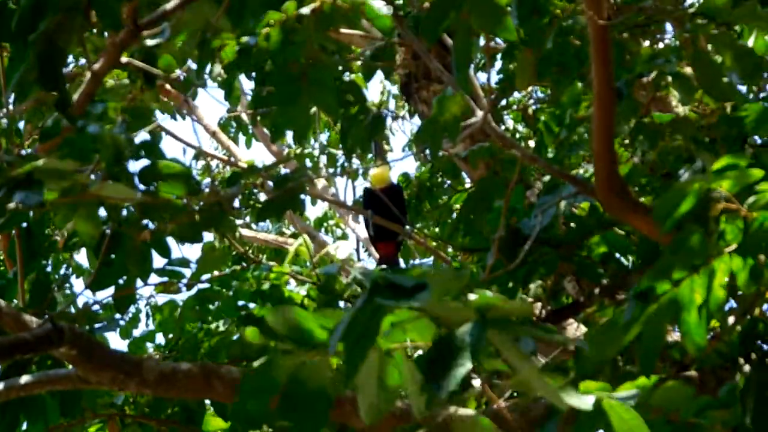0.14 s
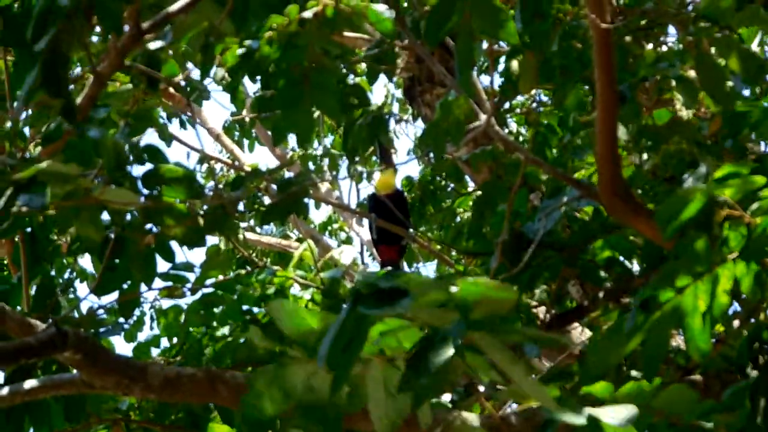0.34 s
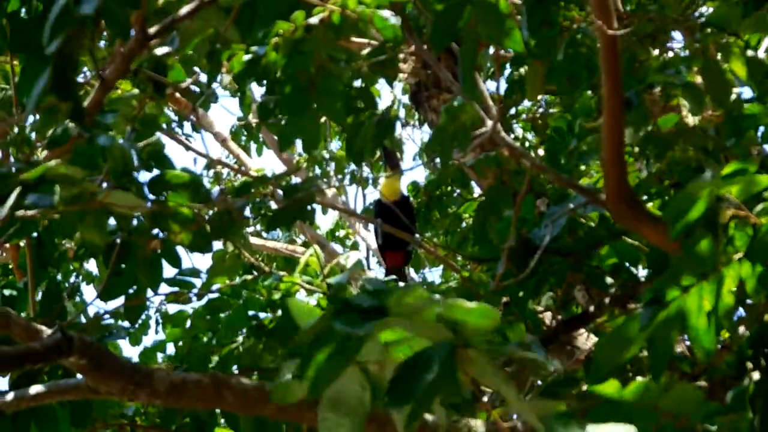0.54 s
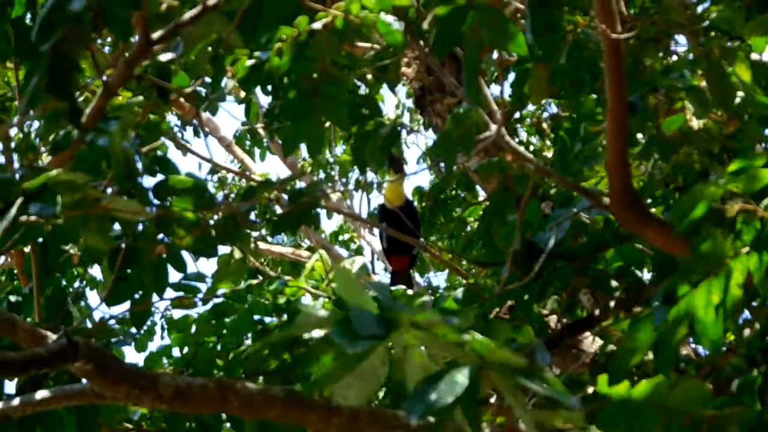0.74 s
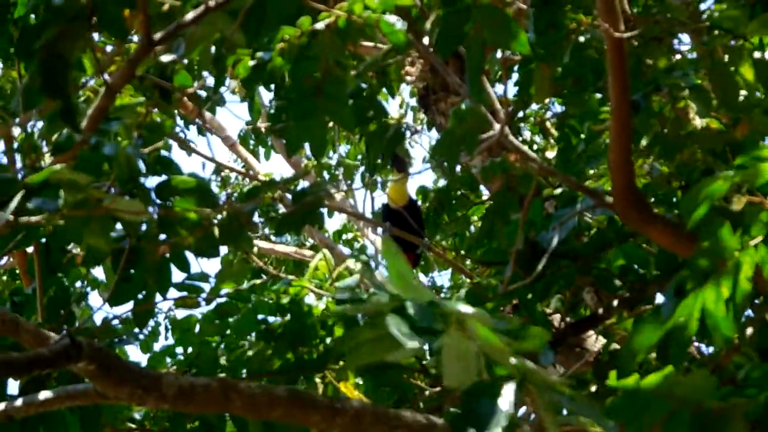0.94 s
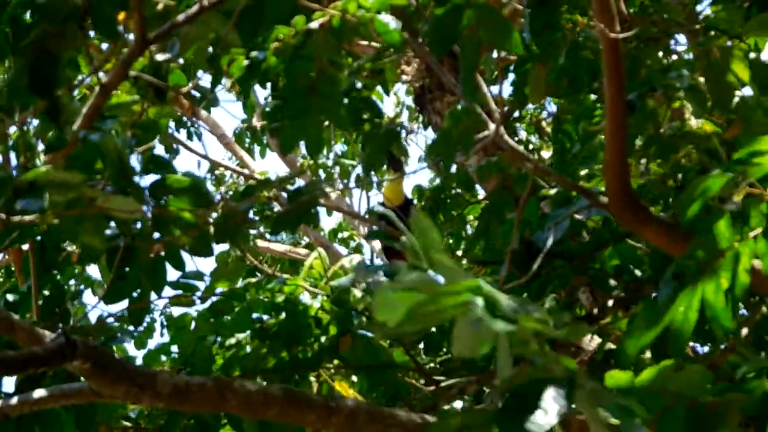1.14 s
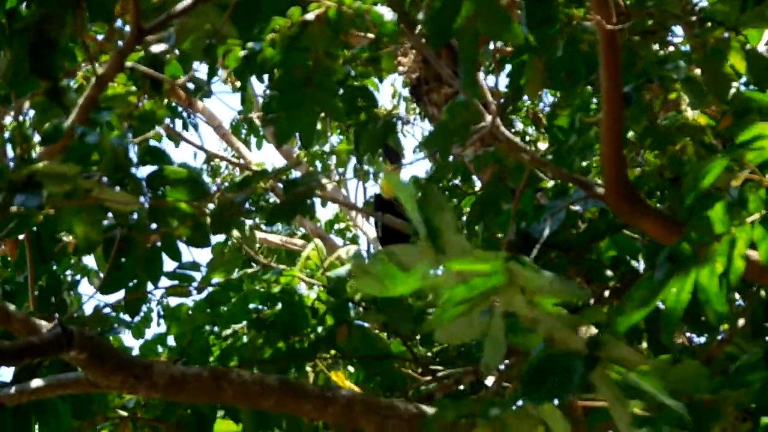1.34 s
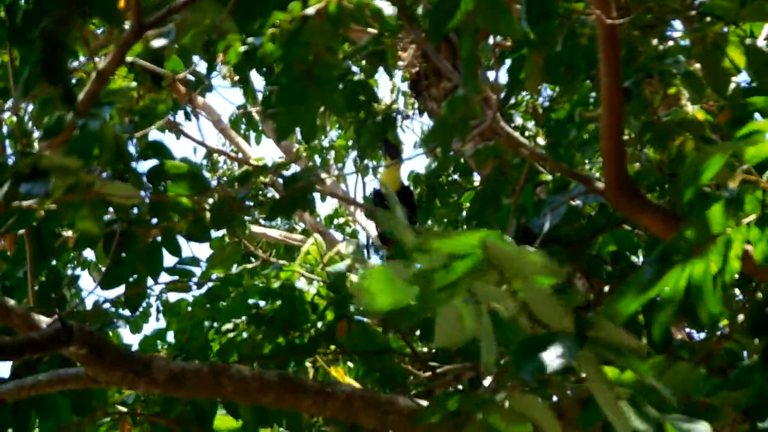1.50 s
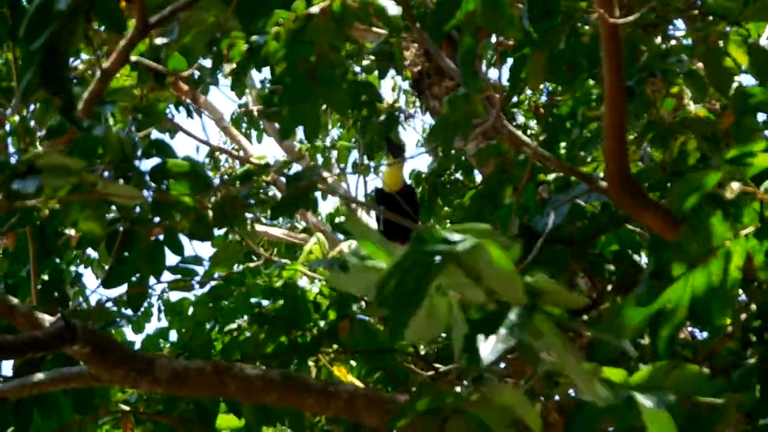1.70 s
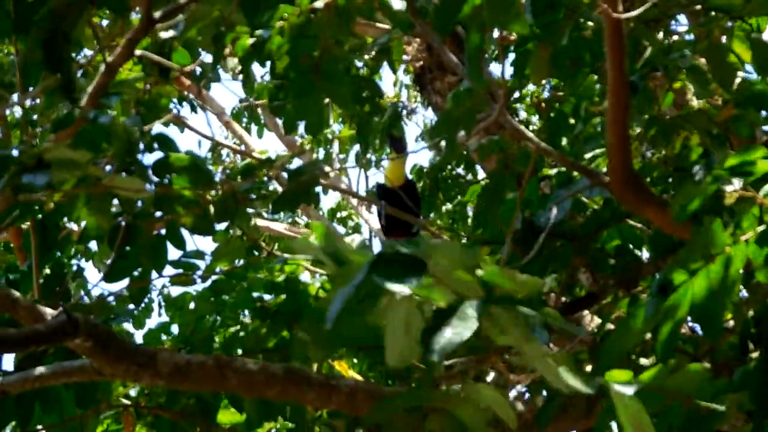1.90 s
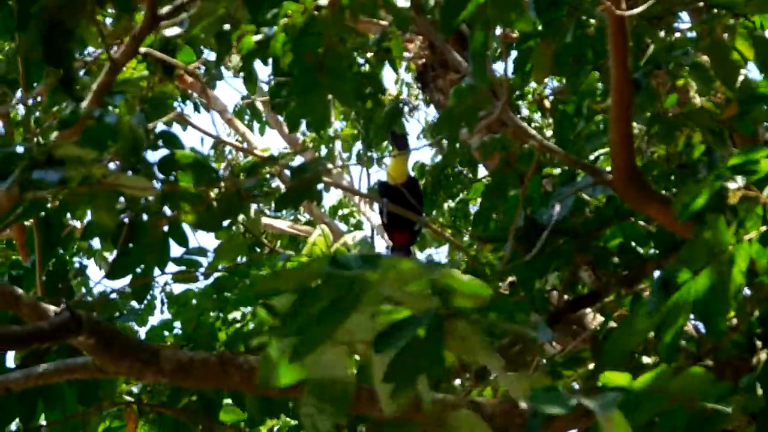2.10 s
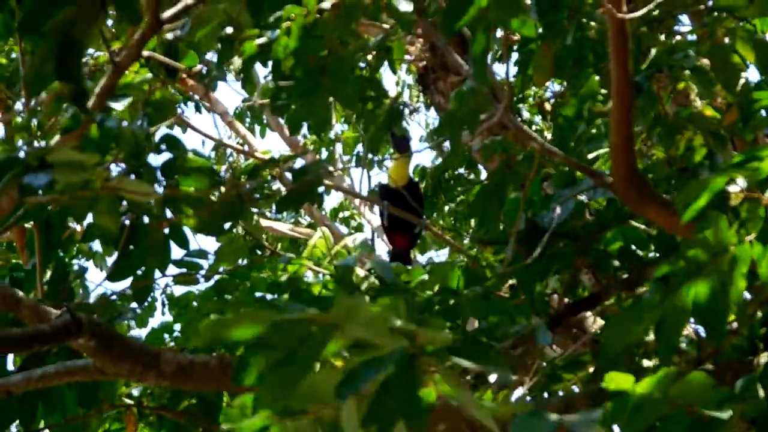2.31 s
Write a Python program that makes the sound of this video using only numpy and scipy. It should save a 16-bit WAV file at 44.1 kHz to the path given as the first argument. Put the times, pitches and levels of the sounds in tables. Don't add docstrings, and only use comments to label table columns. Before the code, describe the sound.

Four bright toucan yelps drop in pitch within the first second, the first longest, with woodland reverberation; afterwards only breeze, soft rumble, high insects and a faint distant bird whistle reach the stereo microphone.

```python
import sys
import numpy as np
from scipy import signal
from scipy.fft import rfft, irfft, next_fast_len
from scipy.io import wavfile
from scipy.ndimage import uniform_filter1d, map_coordinates

SR = 44100
rng = np.random.default_rng(int(sys.argv[2]) if len(sys.argv) > 2 else 0)


def linear_from_db(decibels):
    return 10 ** (np.asarray(decibels, float) / 20)


def transcribe(u):
    v = np.clip(np.atleast_2d(u).T, -1, 1)
    q = np.round(v * 32767).astype(np.int16)
    wavfile.write(sys.argv[1], SR, q)


N = 103635
TIME_S = np.arange(N) / SR
FLOOR_LAG_S, FLOOR_PAN_DB = -.00011, 0.6


def unit(x):
    return x / np.sqrt(np.mean(x ** 2) + 1e-20)


def along(points, hz):
    f, value = np.transpose(points)
    return np.interp(np.log(hz + 1), np.log(f + 1), value)


def wobble(rate):
    knots = rng.standard_normal(int(N * rate / SR) + 4)
    return map_coordinates(knots, [np.arange(N) * rate / SR])


def filtered(x, response):
    m = next_fast_len(N + SR // 2)
    return irfft(rfft(x, m) * response(np.fft.rfftfreq(m, 1 / SR)), m)[..., :N]


def track(rows, smooth_s):
    s, hz, db = np.transpose(rows)
    width = int(smooth_s * SR)
    gain = linear_from_db(np.interp(TIME_S, s, db)) * (TIME_S >= s[0]) * (TIME_S <= s[-1])
    pitch = uniform_filter1d(np.interp(TIME_S, s, hz), width)
    return pitch, np.sqrt(2) * uniform_filter1d(gain, width // 2)


def ports(x, pan_db, lag_s):
    side = np.array([[1], [-1]])
    return filtered(x * linear_from_db(side * pan_db / 2), lambda hz: np.exp(-1j * np.pi * hz * lag_s * side))


# f/Hz, correlation
PORT_LIKENESS = [(30, 0.58), (170, 0.95), (700, 0.89), (1500, 0.69), (3000, 0.067), (5700, 0.37),
                 (9500, 0.38), (15000, 0.1)]


def rush(colour, patchy_db):
    z = signal.stft(rng.standard_normal((2, N)), nperseg=512)[2]
    patches = uniform_filter1d(rng.standard_normal(z.shape[1:]), 6, 0)
    patches = uniform_filter1d(patches, 12, 1)
    pair = signal.istft(z * linear_from_db(patchy_db * unit(patches)), nperseg=512)[1][:, :N]

    def mid_side(hz):
        turn = np.arccos(np.clip(along(PORT_LIKENESS, hz), 0, 1)) / 2
        return colour(hz) * [np.cos(turn), np.sin(turn)]

    mid, side = filtered(pair, mid_side)
    return unit(ports(np.array([mid + side, mid - side]), FLOOR_PAN_DB, FLOOR_LAG_S))


SYRINX_DB = [0, 0, -16, -22, -19, -22, -27, -34, -36, -36]
# f/Hz, level/dB
THROAT_TONE = [(4600, 0), (5500, -3), (6300, -7), (7300, 0), (7900, -8), (9200, 2), (11000, 2), (12800, -5)]


def yelp(rows, third_db, split_db, upper_db):
    s, _, _, gape = np.transpose(rows)
    hz, gain = track(np.array(rows)[:, :3], .004)
    gape_db = np.interp(TIME_S, s, gape)
    phase = 2 * np.pi * np.cumsum(hz + 7.44 * wobble(150)) / SR
    lift_db = [0, gape_db, third_db] + [upper_db + gape_db] * 7
    tone = 0
    for k, db in enumerate(SYRINX_DB):
        flutter_db = (3 if k < 2 else 5) * wobble(69.26)
        level_db = db + lift_db[k] + along(THROAT_TONE, (k + 1) * hz) + flutter_db
        tone = tone + linear_from_db(level_db) * np.sin((k + 1) * phase)
    falling = 1 / (1 + np.exp((hz - 1445) / 15))
    split = linear_from_db(split_db) * np.sin(3 * phase / 2) * falling
    hiss = filtered(rng.standard_normal(N), lambda f: (f > 900) / (1 + (f / 4000) ** 4))
    breath = linear_from_db(-40) * (1 + np.cos(phase)) * hiss
    return gain * (tone + split + breath)


def scatter(x, t60s, start_s):
    hz, t, z = signal.stft(rng.standard_normal((3, SR)), SR, nperseg=128)
    decay = linear_from_db(-60 * t / along(t60s, hz)[:, None])
    tail = signal.istft(z * decay, SR, nperseg=128)[1]
    tail = tail[:2] + 0.72 * tail[2]
    late = np.pad(x, (int(start_s * SR), 0))[None]
    return signal.fftconvolve(late, tail / np.linalg.norm(tail[0]), axes=1)[:, :N]


YELP_ROWS = [
    [(.193, 1822, -50, 4), (.203, 1821, -21.5, 0), (.216, 1839, -21.5, 7.5), (.234, 1826, -19, -1.5),
     (.256, 1635, -18.5, -2.5), (.278, 1575, -17.5, -5.5), (.355, 1545, -18, -6.5),
     (.372, 1483, -22.5, 2.5), (.398, 1188, -39, -2)],
    [(.456, 1632, -41, 28.5), (.464, 1645, -16, -1.5), (.486, 1608, -17.5, 8), (.5, 1510, -20.5, 0.5),
     (.514, 1294, -32.5, 7.5), (.528, 1130, -42, -3)],
    [(.782, 1605, -51, 20), (.79, 1568, -28.5, 10.5), (.804, 1492, -22.5, 3.5), (.819, 1327, -39, 4.5),
     (.826, 1210, -39, -3)],
    [(.889, 1605, -62, 2), (.897, 1565, -28, 8.5), (.908, 1492, -23, 6.5), (.92, 1284, -31.5, 1.5),
     (.925, 1156, -43, -6)],
]
# third multiple/dB, split voice/dB, left over right/dB, higher multiples/dB
HEAD_POSE = [
    (0, -50, -1.5, -1),
    (-8, -45, 0, -2),
    (-2, -6, 3, -9),
    (-2, -24, 2.5, -7),
]
# straight to the microphone/dB, nearby leaves/dB, whole grove/dB
YELP_SENDS = [
    (0.5, -6.5, -3.5),
    (-1.5, -7, -12.5),
    (2, -4.5, -29),
    (3.5, -5, -13),
]
# delay t/s, level/dB, left over right/dB
TRUNK_ECHOES = [
    (.006, -22.5, -20),
    (.011, -13, 6.5),
    (.019, -14.5, -0.5),
    (.028, -16, -8.5),
    (0.151, -31, 2),
    (.21, -36.5, 10),
]
# f/Hz, t60/s
LEAF_DECAY = [(1000, 0.11), (3000, 0.25), (10000, 0.11)]
GROVE_DECAY = [(1000, 0.59), (3000, 0.52), (5000, 1), (10000, 0.58)]
FAR_DECAY = [(1000, 1.14), (3000, 1.17), (10000, 0.55)]


def toucan():
    voices = np.array([yelp(rows, third, split, upper)
                       for rows, (third, split, _, upper) in zip(YELP_ROWS, HEAD_POSE)])
    direct = sum(linear_from_db(send[0]) * ports(voice, head[2], .00002)
                 for voice, head, send in zip(voices, HEAD_POSE, YELP_SENDS))
    direct = filtered(direct, lambda f: linear_from_db(-2 / (1 + (4000 / (f + 1)) ** 8)))
    near, wide = linear_from_db(np.transpose(YELP_SENDS)[1:]) @ voices
    echoes = 0
    for s, db, pan_db in TRUNK_ECHOES:
        late = np.pad(near, (round(s * SR), 0))[:N]
        echoes = echoes + linear_from_db(db + 5) * ports(late, pan_db, -pan_db * 2e-5)
    leaves = scatter(near, LEAF_DECAY, .003)
    grove = scatter(wide, GROVE_DECAY, 0.016)
    far_wall = linear_from_db(-21.5) * scatter(voices.sum(0), FAR_DECAY, .04)
    return direct + echoes + leaves + grove + far_wall


# t/s, level/dB
BILL_CLICKS = [
    (.166, -30),
    (.217, -25),
    (.237, -27),
    (.29, -23),
    (.485, -28),
    (.755, -40),
]
# f/Hz, level/dB
CLICK_TONE = [(300, -16), (1000, -2), (2800, 0), (4500, -8), (9000, -25)]


def bill():
    t, clicks = np.arange(SR // 50) / SR, np.zeros(N)
    for s, db in BILL_CLICKS:
        clicks[round(s * SR):][:len(t)] += linear_from_db(db - 60 * t / .01) * rng.standard_normal(len(t))
    return ports(filtered(clicks, lambda f: linear_from_db(along(CLICK_TONE, f))), 0, 0)


# t/s, length/s, level/dB
PERCH_SHAKES = [
    (0.436, 0.042, -42),
    (0.829, 0.059, -42.5),
    (0.914, 0.016, -40),
    (1.658, .04, -52),
]
# f/Hz, level/dB
SHAKE_TONE = [(120, -30), (250, 8), (600, -0.5), (1200, 1.5), (2500, 6), (6000, -56)]


def perch():
    swell = sum(linear_from_db(db) * np.exp(-((TIME_S - s) / length) ** 2) for s, length, db in PERCH_SHAKES)
    return swell * rush(lambda f: linear_from_db(along(SHAKE_TONE, f)), patchy_db=-5.5)


# t/s, f/Hz, level/dB
FOWL_CROW = [
    (0, 404, -65),
    (.04, 409, -52),
    (.075, 416, -56),
    (.12, 449, -69),
    (.175, 458, -55),
    (.2, 483, -78),
]
# t/s, f/Hz, level/dB
FAR_WHISTLE = [
    (1.98, 1310, -71),
    (2.05, 1308, -67),
    (2.35, 1327, -58.5),
]


def far_birds():
    hz, gain = track(FOWL_CROW, .01)
    phase = 2 * np.pi * np.cumsum(hz) / SR
    low = 1 / (1 + np.exp(np.clip((TIME_S - 0.08) / 0.0071, -30, 30)))
    crow = gain * (low * np.sin(phase) + linear_from_db(-5.5 * low) * np.sin(2 * phase))
    hz, gain = track(FAR_WHISTLE, .01)
    swell = gain * linear_from_db(2.2 * wobble(15))
    whistle = swell * np.sin(2 * np.pi * np.cumsum(hz + 0.98 * wobble(10)) / SR)
    return ports(crow + whistle, 0, FLOOR_LAG_S)


# f/Hz, width/Hz, level/dB
INSECT_SINGERS = [
    (7477, 540, -56.5),
    (7414, 53, -56),
    (7660, 150, -63.5),
]


def insects():
    chorus = 0
    for hz, width, db in INSECT_SINGERS:
        swell = linear_from_db(db + 3.4 * wobble(25.2) + 0.5 * wobble(4.68))
        chorus = chorus + swell * rush(lambda f: 1 / (1 + ((f - hz) / width) ** 4), patchy_db=0)
    return chorus


# t/s, level/dB
AIR_STRENGTH = [
    (0.0, -54.5),
    (1.46, -56.5),
    (2.35, -57.5),
]
# f/Hz, level/dB per Hz
RUMBLE_TONE = [(29, -34), (50, 3), (123, -3), (167, -1.5), (421, -5.5), (1000, -11.5), (1300, -38),
               (2200, -120)]
HISS_TONE = [(470, -23), (800, -9), (4330, -4), (5780, -5.5), (7520, -8), (8210, -8), (13400, -13),
             (15200, -22.5), (15900, -55)]
# t/s, level/dB
PORT_GUSTS = [
    (0.0, -46),
    (0.37, -58.5),
    (0.58, -47.5),
    (0.65, -64),
    (0.98, -50.5),
    (2.35, -67),
]


def air():
    s, db = np.transpose(AIR_STRENGTH)
    strength_db = np.interp(TIME_S, s, db)
    swing_db = strength_db - strength_db.mean()
    rumble_gain = linear_from_db(2.5 + swing_db + 0.27 * wobble(12))
    rumble = rumble_gain * rush(lambda f: linear_from_db(along(RUMBLE_TONE, f)), patchy_db=2.0)
    hiss_gain = linear_from_db(9 + .5 * swing_db + .4 * wobble(6.8))
    hiss = hiss_gain * rush(lambda f: linear_from_db(along(HISS_TONE, f)), patchy_db=1.5)
    gust_gain = linear_from_db(np.interp(TIME_S, *np.transpose(PORT_GUSTS)) + 2 + 0.8 * wobble(8.1))
    gust = gust_gain * rush(lambda f: (f > 12) / (1 + (f / 45) ** 3), patchy_db=-0.5)
    return linear_from_db(strength_db.mean()) * (rumble + hiss) + gust


def mains_hum():
    gain = linear_from_db(-61 + 1.6 * wobble(4.45)) * np.sqrt(2)
    return gain * np.sin(2 * np.pi * np.cumsum(117.5 + 0.96 * wobble(7.73)) / SR)


def scene():
    return toucan() + bill() + perch() + far_birds() + insects() + air() + mains_hum()


def low_pass(x):
    return signal.sosfilt(signal.butter(12, 16080, fs=SR, output="sos"), x)


def record(dry):
    mix = filtered(dry, lambda f: 1 / (1 + (f / 15750) ** 80))
    return low_pass(mix)


dry = scene()
out = record(dry)
transcribe(out)
```